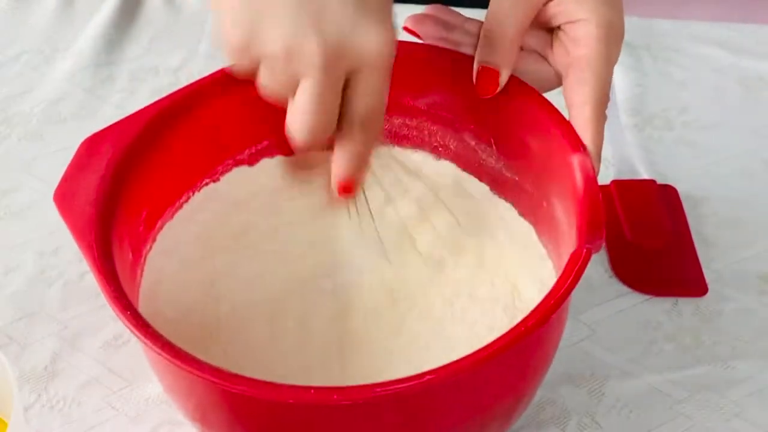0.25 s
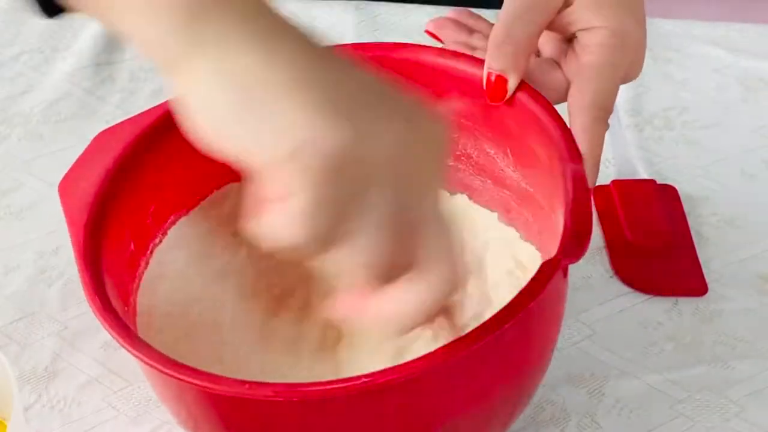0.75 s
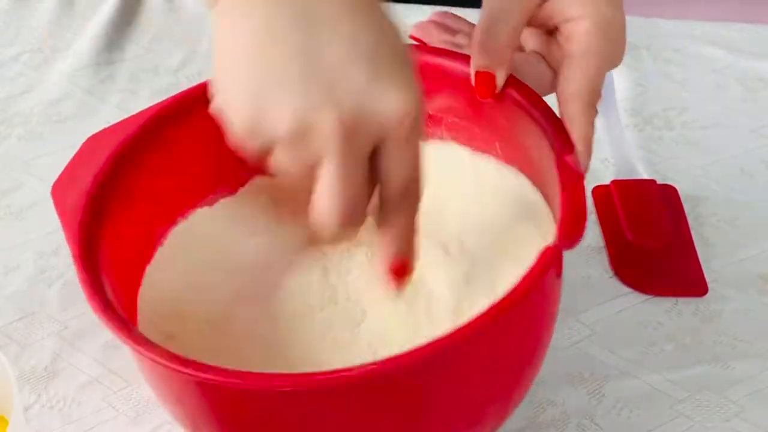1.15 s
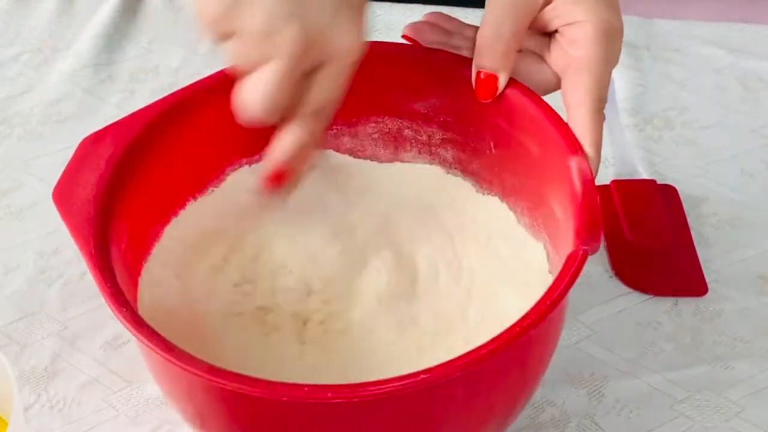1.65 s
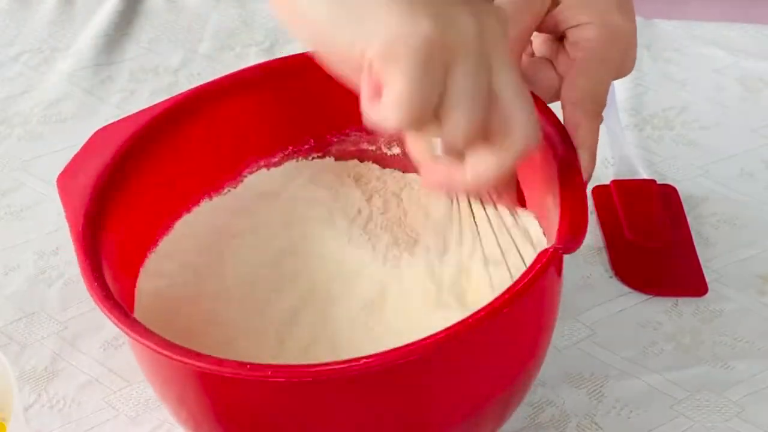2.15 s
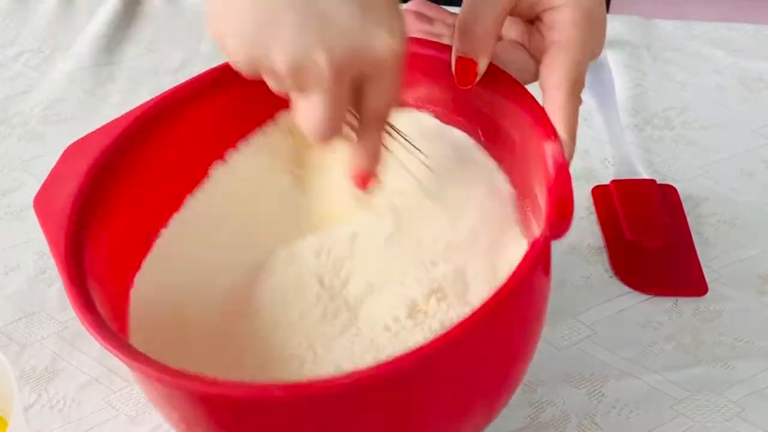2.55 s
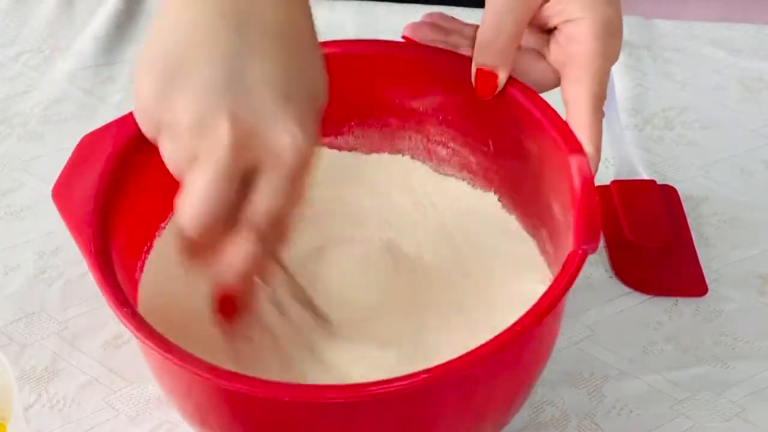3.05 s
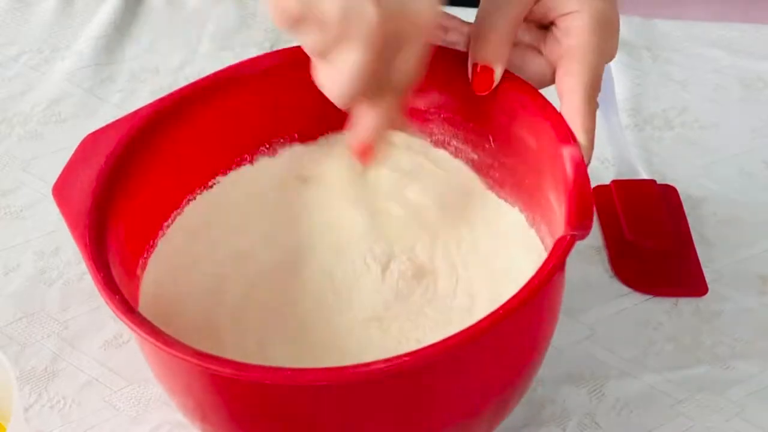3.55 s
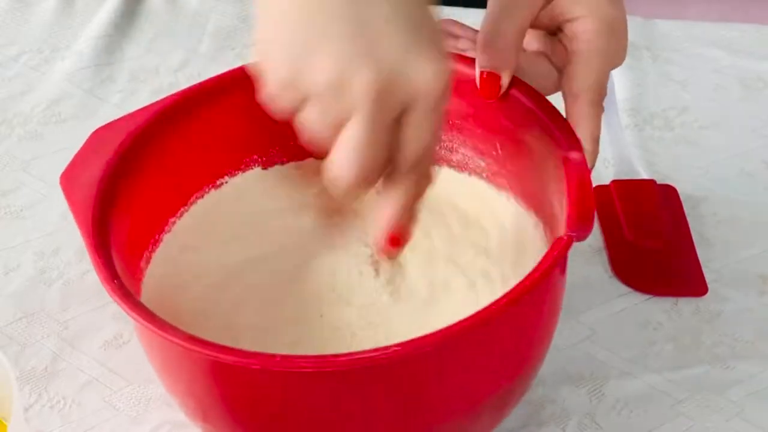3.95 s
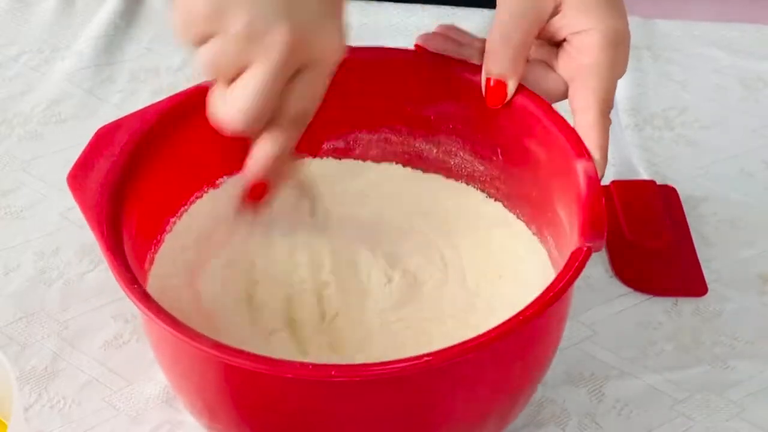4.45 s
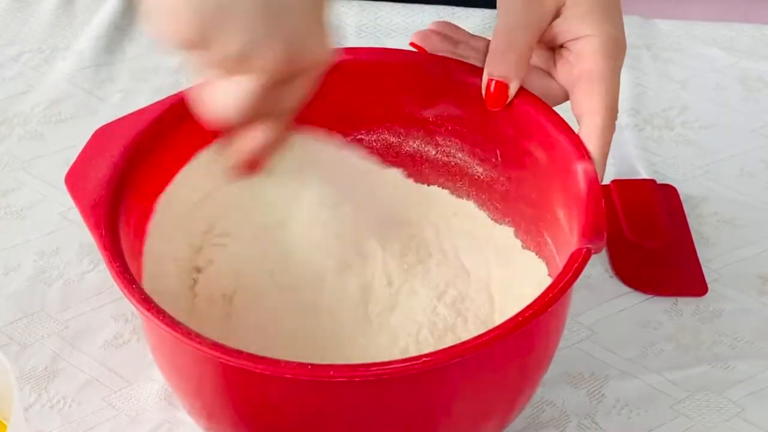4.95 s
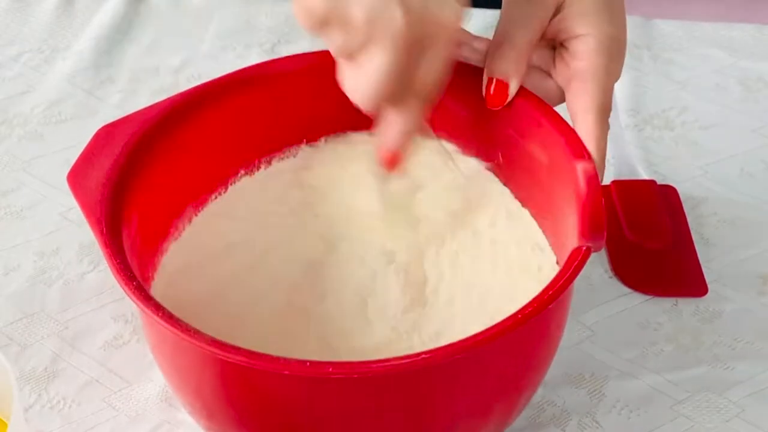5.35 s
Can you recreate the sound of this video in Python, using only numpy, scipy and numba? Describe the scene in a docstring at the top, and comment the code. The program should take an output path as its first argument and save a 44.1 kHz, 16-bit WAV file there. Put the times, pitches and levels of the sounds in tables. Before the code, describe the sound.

A wire whisk stirs dry flour and coarse meal in a plastic bowl for about five and a half seconds, heard from close above. It opens with hollow scrapes and light knocks on the wall. A bright, sandy swish swells at 0.8 seconds, followed by soft thumps around 1 second as the bowl rocks on a cloth-covered table. Scraping returns from 1.3 to 2 seconds, ending in a firmer knock. Hissing, gritty sweeps come in quick succession from 2.2 to 3.1 seconds, with a sharp wire click near 2.9. Lighter swishes, crunching and scrapes continue, with dull bumps around 3.7 and 4 seconds. From 4.7 seconds to the end, the powder swishes strongly again in several surges, with more clicks and low bumps. Small wire ticks are scattered throughout, over a very faint low room rumble.

```python
"""Wire tips scrape and knock on a plastic bowl as a whisk circles through dry flour and cornmeal.
Stick-slip friction and impacts drive the wall's modes; powder hisses through the wires, grit patters
and coarse meal crunches, each a dense train of random collisions. The wires tick, and the bowl
rocks on a cloth-covered table over a faint room rumble. A phone close above hears the powder first
at its left microphone port and the other layers first at its right."""
import sys
import numpy as np
from scipy import signal
from scipy.fft import rfft, irfft, next_fast_len
from scipy.io import wavfile
from numba import njit

SR = 44100
rng = np.random.default_rng(int(sys.argv[2]) if len(sys.argv) > 2 else 0)


def waveform_to_disk(signal):
    """Save audio, clipped to [-1, 1], as 16-bit WAV at the path in sys.argv[1]."""
    frames = np.transpose(np.atleast_2d(signal))
    scaled = np.clip(frames, -1, 1) * 32767
    samples = np.round(scaled).astype(np.int16)
    wavfile.write(sys.argv[1], SR, samples)


N = 246959

# Wire tips dragging on the plastic. Each row: middle in seconds, length in seconds, scrape level in dB,
# centre frequency in Hz, crunch level in dB.
SCRAPES = [(0.081, 0.13, -29, 1030, -32.5), (0.149, 0.054, -28, 960, -44), (0.202, 0.14, -29.5, 1000, -41),
           (0.349, 0.074, -24.5, 1120, -33), (0.423, 0.077, -25, 870, -46),
           (0.467, 0.16, -26.5, 1080, -36.5), (0.712, 0.15, -40, 660, -55), (0.81, 0.07, -34, 1190, -31),
           (1.075, 0.16, -37, 860, -35.5), (1.233, 0.13, -33, 1020, -44), (1.369, 0.11, -25.5, 1075, -31.5),
           (1.6, 0.23, -30.5, 1250, -43), (1.648, 0.15, -26, 1010, -33), (1.782, 0.095, -29.5, 930, -30.5),
           (1.836, 0.074, -29.5, 1150, -31), (1.892, 0.052, -38, 1000, -36),
           (1.94, 0.14, -22.5, 1075, -35.5), (2.193, 0.14, -37, 1140, -42), (2.297, 0.031, -34, 710, -25.5),
           (2.396, 0.033, -35.5, 980, -25.5), (2.505, 0.092, -40, 1330, -32.5),
           (2.579, 0.019, -30.5, 1410, -34), (2.716, 0.096, -29, 1410, -29.5),
           (2.847, 0.18, -30.5, 1070, -33), (3.054, 0.067, -27.5, 1330, -39),
           (3.153, 0.76, -37.5, 1140, -34), (3.162, 0.12, -28, 1110, -47), (3.253, 0.049, -35.5, 1070, -38),
           (3.413, 0.13, -29.5, 990, -35), (3.497, 0.26, -30.5, 1140, -49), (3.746, 0.13, -29.5, 930, -41),
           (3.837, 0.15, -29.5, 1140, -50), (4.012, 0.12, -34, 1060, -48), (4.15, 0.13, -27.5, 1060, -47),
           (4.29, 0.16, -37.5, 1040, -57), (4.378, 0.046, -31.5, 1130, -43), (4.463, 0.11, -26, 760, -38),
           (4.665, 0.17, -38.5, 1250, -36), (4.797, 0.18, -35, 1100, -41), (5.022, 0.17, -38, 1100, -29.5),
           (5.182, 0.1, -31.5, 1250, -49), (5.246, 0.026, -31.5, 1190, -49), (5.34, 0.14, -34, 1010, -28),
           (5.542, 0.1, -30, 1060, -26)]
# Powder streaming through the wires, swelling on each fast sweep. Each row: time in seconds,
# hiss level in dB, crunch level in dB, coarse patter relative to the hiss in dB.
STREAM = [(0.0, -52, -58, -17), (0.3, -50.5, -48, -2), (0.53, -39.5, -38.5, -0.5), (0.65, -38.5, -40, 0.5),
          (0.8, -21, -31.5, -5.5), (0.87, -23, -30.5, -9), (0.93, -30, -36, -4.5),
          (1.15, -32.5, -40.6, 0.5), (1.45, -34, -37, -4), (2.07, -45, -44, 1.5), (2.27, -22, -29, -3),
          (2.43, -28.5, -32, -5), (2.5, -27, -33.5, -1), (2.56, -31, -36, 0), (2.6, -39.5, -40.5, 1),
          (2.7, -32, -46, -1), (3.1, -36.5, -42, -1.5), (3.4, -41, -44, -0.5), (3.7, -49, -52, 3),
          (4.05, -51, -40, -2), (4.35, -45.5, -39, -1.5), (4.55, -43, -37, 1.5), (4.7, -29.5, -45, -2),
          (4.79, -23.5, -29, -3), (4.87, -20, -26.5, -8.5), (4.95, -27, -41.5, -1.5),
          (5.08, -28, -46, -1.5), (5.13, -28, -40, -3), (5.17, -25, -24.5, -6), (5.24, -25, -26, -9.5),
          (5.34, -34.5, -54, 2), (5.46, -25, -37.5, -4.5), (5.6, -24, -25, -8)]
# Flicks that throw powder. Each row: middle in seconds, length in seconds, three levels as in STREAM.
FLICKS = [(0.073, 0.059, -35, -37, -3), (0.145, 0.13, -47.5, -47, 2.5), (0.235, 0.088, -39, -34.5, 0.5),
          (0.328, 0.053, -37, -40, 0), (0.49, 0.096, -41, -31.5, 5), (1.193, 0.041, -19, -44, -4),
          (1.26, 0.088, -23, -25, -13), (1.397, 0.066, -36, -30, 5), (1.526, 0.017, -31, -33.5, -19),
          (1.82, 0.081, -33, -42, -21), (1.958, 0.08, -40.5, -34, 3), (2.646, 0.035, -23.5, -49, -2.5),
          (2.747, 0.16, -26, -32.5, -25), (2.884, 0.028, -28, -24.5, -2), (2.978, 0.097, -22.5, -56, -6),
          (3.046, 0.049, -25, -30.5, -6.5), (3.21, 0.11, -35.5, -31.5, -1), (3.298, 0.064, -27, -37, -3.5),
          (3.348, 0.011, -27, -36, -14), (3.527, 0.19, -34, -32, -0.5), (3.653, 0.038, -26, -40, -6),
          (3.716, 0.017, -34, -39, -4), (3.88, 0.28, -33.5, -31, -0.5), (3.97, 0.052, -24, -50, -6.5),
          (4.031, 0.0088, -27, -29.5, -10), (4.12, 0.055, -41, -48, -16), (4.176, 0.19, -41, -38.5, 2.5),
          (4.24, 0.025, -37, -48, -8), (4.317, 0.068, -30.5, -43, -6), (4.464, 0.054, -40.5, -47, 1),
          (4.53, 0.026, -50, -32, 8), (4.979, 0.044, -27.5, -31.5, 0)]
# The crunch's colour as the wires near and leave the wall. Each row: time in seconds, centre in Hz.
CRUNCH_CENTRE = [(0.0, 1810), (0.06, 2280), (0.14, 1900), (0.78, 2200), (0.87, 2740), (1.06, 2190),
                 (1.26, 2510), (1.4, 1900), (1.46, 2560), (1.53, 2000), (1.7, 2200), (1.78, 1900),
                 (2.2, 2330), (2.24, 2020), (2.31, 2680), (2.63, 2290), (2.7, 2840), (2.78, 2220),
                 (2.95, 2170), (3.06, 2660), (3.12, 2140), (3.91, 2150), (3.98, 2620), (4.21, 1850),
                 (4.62, 2330), (4.77, 2090), (4.94, 2850), (4.99, 2450), (5.43, 2360), (5.47, 1810),
                 (5.54, 2640), (5.6, 2520)]
# The bowl rocking. Each row: time in seconds, level in dB, low sway relative to the rim's drone in dB.
ROCKING = [(0.0, -50, -2.5), (0.33, -39.5, -3), (0.61, -51, 1.5), (0.67, -44, -11), (0.97, -49.5, 1),
           (1.01, -34.5, -8), (1.06, -30.5, -5.5), (1.17, -42.5, 0.5), (1.26, -34, -4.5), (1.34, -48, 3),
           (1.4, -34, -1), (1.46, -51, -2), (1.67, -45.5, 4.5), (1.73, -43.5, -17), (2.0, -41, -7),
           (2.06, -55, 0), (2.2, -42, -6), (2.48, -49, 6.5), (2.51, -41.5, -13), (2.6, -49, 6),
           (2.73, -35.5, -10), (2.85, -46, 5), (2.89, -41.5, -3.5), (3.66, -45.5, 0), (3.73, -43, 3),
           (3.74, -46, 11), (3.88, -43, -6), (4.01, -51, -3), (4.04, -38, -13), (4.07, -50, 12),
           (4.18, -48, -2), (5.15, -41, 0.5), (5.26, -35, -0.5), (5.43, -46, -1), (5.57, -32, -4),
           (5.6, -47, 7)]
# A wire loop striking the wall. Each row: start in seconds, level in dB.
KNOCKS = [(0.059, -17.5), (0.085, -22), (0.156, -16.0), (0.347, -23), (0.4655, -24), (0.4795, -18),
          (0.489, -20), (1.354, -16.5), (1.929, -14.0), (1.954, -8), (2.166, -24), (2.392, -22),
          (3.055, -23.0), (3.375, -21), (3.412, -17.5), (4.037, -23), (4.086, -23), (4.149, -18),
          (5.337, -25)]
# The bowl's foot striking the table. Each row: start in seconds, level in dB, frequency in Hz.
BUMPS = [(0.092, -27, 97), (1.005, -21, 252), (1.035, -18, 307), (1.061, -16, 300), (1.091, -24, 107),
         (1.22, -40, 122), (3.72, -20.5, 107), (4.032, -23, 313), (4.059, -24, 92), (5.089, -25.5, 117),
         (5.167, -22, 162), (5.341, -28, 117), (5.486, -23.5, 126)]
# Wires snapping free or colliding. Each row: start in seconds, levels of snap, ring and body in dB.
TICKS = [(0.2332, -21.0, -27, -24), (0.4654, -21.0, -22, -18.0), (0.4833, -18.0, -29, -22),
         (0.4887, -18, -30, -17.0), (0.5091, -23, -34.0, -33), (0.647, -22.0, -23, -35.0),
         (0.703, -18, -19, -21.5), (0.7407, -6, -17, -25.0), (1.1774, -13.0, -20, -35.0),
         (1.187, -6, -12, -16), (1.1926, -18.0, -23, -33), (1.22, -24, -24, -14.0),
         (1.258, -35.0, -35.0, -21), (1.2707, -19, -21.0, -17), (1.395, -11.5, -16.0, -12),
         (2.028, -11.5, -29, -35.0), (2.1672, -33, -21, -23), (2.2266, -10, -16, -17.0),
         (2.2746, -35.0, -18, -19), (2.298, -16, -23, -16), (2.393, -7, -24, -20),
         (2.6641, -11, -26.0, -28), (2.68, -17, -22.0, -21), (2.7632, -17, -27, -22),
         (2.8754, -2.5, -6, -13.0), (2.889, -15, -19, -13), (3.029, -21, -33, -18.0),
         (3.2231, -11, -20.0, -12), (3.2515, -21, -25, -16.5), (3.3481, -17.0, -28.0, -26),
         (3.7151, -20.0, -22, -28), (3.7666, -31.0, -42, -14), (3.8862, -14.0, -25, -21.0),
         (4.032, -19.0, -25, -14.0), (4.0348, -19, -27.0, -19), (4.2164, -19, -23, -24.0),
         (4.5227, -22, -25, -16), (4.5266, -35.0, -27.0, -23), (4.533, -22, -31.0, -17),
         (4.8067, -39, -16, -17), (4.825, -12.0, -21, -35.0), (4.8475, -7, -15, -12),
         (4.9827, -14.0, -14.0, -16), (5.0732, -15.0, -31, -18.0), (5.1217, -13.0, -23.0, -30.0),
         (5.148, -18, -27, -23), (5.2022, -21.0, -15, -19), (5.3367, -5, -10, -13), (5.4, -16, -25, -35.0),
         (5.4818, -7.0, -18, -19.0), (5.5457, -26.0, -21.0, -19), (5.5673, -35.0, -18, -13)]
# The whisk stalling. Each row: middle in seconds, length in seconds, change of level in dB.
STALLS = [(0.523, 0.052, -7), (1.205, 0.022, -8), (3.016, 0.016, -2.5), (3.327, 0.017, -6),
          (3.367, 0.018, -8.5), (3.753, 0.042, -14.5), (3.999, 0.042, -7.5), (4.067, 0.038, -7.5),
          (4.503, 0.026, -4.5), (5.501, 0.011, -6)]

# Spectral peaks. Each row: frequency in Hz, bandwidth in Hz, gain in dB.
WALL_MODES = [(524, 47, 5), (676, 134, 2), (823, 94, -1.5), (898, 23, 1.5), (1049, 40, -5.5),
              (1121, 16.3, 3.5), (1212, 59, -0.5), (1354, 52, 3), (1487, 58, -1.5), (1642, 7.1, 4),
              (1920, 18, 1), (1998, 47, -2.5), (2290, 73, 0), (2950, 47, -29)]
GRIT_COLOURS = [(3880, 100, 1.5), (4454, 140, 13), (4950, 640, -5), (5690, 300, 8), (6620, 320, -1),
                (7610, 560, -1)]  # narrow peaks in the patter
HOLLOW_MODES = [(1793, 310, -4), (2065, 67, 7), (2280, 540, -6), (2585, 93, 6.5), (2754, 90, 5),
                (3067, 223, 7), (3540, 500, -3)]  # spaces between wires and wall
BOWL_MODES = [(116.7, 6.7, 3), (177.6, 49, -1), (247, 91, -5), (310, 72, -1.5), (368, 59, -1.5),
              (463, 110, -8)]  # two of the sway, then four of the rim

# Spectral envelopes. Each row: frequency in Hz, gain in dB.
POWDER_SPECTRUM = [(8000, -24), (10000, -8), (12000, 0), (14000, 0), (15800, -1)]
THICK_STREAM_SPECTRUM = [(5800, -22), (7000, -5), (8500, -1), (10300, 0), (12000, -6), (14000, -20)]
GRIT_SPECTRUM = [(2800, -47), (3800, 0.5), (5000, 0.5), (5800, 1.5), (6800, -0.5), (8000, 5)]
MEAL_SPECTRUM = [(1000, -2), (1700, 0), (2700, -3.5), (3400, -1), (4500, 0), (6000, -51)]
SNAP_SPECTRUM = [(9000, -32), (10500, 4), (13000, -2), (16500, 1)]
WIRE_SPECTRUM = [(3800, -35), (4800, -8), (7000, 0.5), (8800, 0.5), (10000, -34)]
ROOM_SPECTRUM = [(24, -32), (35, -9), (55, -1), (80, -5.5), (130, -4), (300, -37)]

# Positions. Each triple: left port's lag in ms, left minus right in dB, unshared fraction of the power.
AT_POWDER, AT_MEAL, AT_GRIT = (-.154, 0, .015), (.11, .7, .35), (.19, 2.7, .84)
AT_WALL, AT_TABLE = (.029, -3.5, .27), (.22, -1.6, .037)

CONTACT_DB, CONTACT_HZ = -43.5, 1033  # light contact between scrapes
SCRAPE_SAG_HZ = 138  # the centre sinks as the tips slide down the wall
SETTLING_DB = -49.5  # grains trickle back between strokes
GRIT_PER_CRUNCH = .24  # dB per dB: crushed meal spits grit
WALL_LOSS_DB = 33  # makes up for what a knock loses in the wall's resonances
CUTOFF_HZ = 16600


def undb(db):
    """Amplitude ratio of a level; undb(2 * db) is the power ratio."""
    return 10 ** (np.asarray(db) / 20)


def unit(x):
    """Normalisation to unit RMS."""
    return x / np.sqrt(np.mean(x ** 2))


def drift(rate):
    """Random modulation: Gaussian values 1 / rate seconds apart, joined by straight lines."""
    levels = rng.standard_normal(int(N / SR * rate) + 2)
    return np.interp(np.arange(N) * rate / SR, np.arange(len(levels)), levels)


def curves(table, t):
    """Linear interpolation of a table's columns at times t."""
    times, *columns = np.transpose(table)
    return [np.interp(t, times, column) for column in columns]


def swells(t, middle, length, db):
    """Gaussian power envelopes, one row for each event."""
    return undb(2 * db)[:, None] * np.exp(-8 * ((t - middle[:, None]) / length[:, None]) ** 2)


def summed_db(t, *powers):
    """Incoherent sources add in power: their total at times t becomes a level at every sample."""
    return np.interp(np.arange(N) / SR, t, 10 * np.log10(sum(powers)))


@njit
def bandpass(x, hz, width_hz):
    """A resonator of moving centre and unit peak gain, in state-variable form."""
    y, band, low = np.empty(len(x)), 0., 0.
    for i in range(len(x)):
        g, damping = np.tan(np.pi * hz[i] / SR), width_hz / hz[i]
        v = (band + g * (x[i] - low)) / (1 + g * (g + damping))
        band, low = 2 * v - band, low + 2 * g * v
        y[i] = damping * v
    return y


def ring(x, peaks, wander_db=0., rate=12):
    """Parallel resonators, neighbours in opposite phase; wander_db shifts energy among them at random."""
    gains = np.array([undb(db + wander_db * drift(rate)) * (-1) ** k
                      for k, (_, _, db) in enumerate(peaks)])
    total = np.sqrt(np.sum(gains ** 2, axis=0) / np.sum(undb([db for _, _, db in peaks]) ** 2))
    responses = [signal.lfilter(*signal.iirpeak(hz, hz / width, SR), x) for hz, width, _ in peaks]
    return np.sum(gains * responses, axis=0) / total


def colour(x, spectrum):
    """Zero-phase filtering by a spectral envelope."""
    hz, db = np.transpose(spectrum)
    size = next_fast_len(N)
    log_hz = np.log(np.fft.rfftfreq(size, 1 / SR) + 1)
    gain = undb(np.interp(log_hz, np.log(hz), db, left=-60, right=-60))
    return irfft(rfft(x, size) * gain, size)[:N]


def grains(rate, spread_db):
    """Shot noise: random collisions at a mean rate per second, a few of them large."""
    chance, size, strength = rng.random(N), rng.exponential(size=N), rng.standard_normal(N)
    return (chance < rate / SR) * strength * undb(spread_db * np.minimum(size, 6))


def impacts(times, levels_db, decay_ms, rattle, rebound, rebound_ms):
    """Inelastic collisions: each an impulse, one weaker rebound and a decaying rattle."""
    n = np.arange(int(.03 * SR))
    pulses = rattle * rng.standard_normal((len(times), len(n))) * np.exp(-n / (decay_ms * SR / 1000))
    pulses[:, 0] = 1
    pulses[:, int(rebound_ms * SR / 1000)] = -rebound
    force = np.zeros(N + len(n))
    for start, db, pulse in zip(times, levels_db, pulses):
        force[int(start * SR):][:len(n)] += undb(db) * pulse
    return force[:N]


def ports(source, level_db, hits, lag_ms, pan_db, unshared):
    """Partial coherence: two ports share one sound with a time lag, and each hears its own grains too."""
    size = next_fast_len(N)
    common = np.sqrt(1 - unshared) * unit(source()) * undb(level_db) + hits
    delay = np.exp(-2j * np.pi * np.fft.rfftfreq(size, 1 / SR) * lag_ms / 1000)
    left = irfft(rfft(common, size) * delay, size)[:N]
    own = np.sqrt(unshared) * np.array([unit(source()), unit(source())]) * undb(level_db)
    return (np.array([left, common]) + own) * undb([[pan_db / 2], [-pan_db / 2]])


def scrape(centre_hz):
    """Stick-slip friction drives the wall; the contact spot favours the modes near centre_hz."""
    friction = grains(6000, 2.16)
    wall = ring(friction, WALL_MODES, wander_db=4.6, rate=14)
    hollow_hum = bandpass(friction, centre_hz, width_hz=117.)
    return undb(-7) * wall + bandpass(wall, centre_hz, width_hz=460.) + undb(-2) * hollow_hum


def hiss(thick_db):
    """Tiny collisions of flour with the wires merge into noise; a thicker stream sounds deeper."""
    fine = unit(colour(grains(15000, .34), POWDER_SPECTRUM))
    thick = unit(colour(grains(12000, .98), THICK_STREAM_SPECTRUM))
    return fine + undb(thick_db) * thick


def patter():
    """Shot noise: a gritty patter with brief, randomly shifting narrow peaks from about 4 to 8 kHz."""
    grit = colour(grains(8000, .65), GRIT_SPECTRUM)
    return undb(1.5) * grit + ring(grit, GRIT_COLOURS, wander_db=10.2, rate=25)


def crunch(centre_hz):
    """Cavity resonance colours the noise of coarse meal crushed between wires and wall."""
    meal = colour(grains(5000, 1.7), MEAL_SPECTRUM)
    hollow = undb(-7.5) * meal + ring(meal, HOLLOW_MODES, wander_db=5.3, rate=25)
    return undb(-8) * hollow + bandpass(hollow, centre_hz, width_hz=770.)


def rocking(sway_db):
    """Forced vibration: jolts set the rim droning while the whole bowl sways at lower frequencies."""
    jolts = grains(1500, 2.7)
    drone = unit(ring(jolts, BOWL_MODES[2:], wander_db=1.93, rate=5.1))
    sway = unit(ring(jolts, BOWL_MODES[:2], wander_db=1.6, rate=5.6))
    return drone + undb(sway_db) * sway


def rumble():
    """Band-limited noise forms the room's low background."""
    return colour(rng.standard_normal(N), ROOM_SPECTRUM)


def knocks(centre_hz):
    """Impulse response of the wall: a thud, and the modes that the struck spot favours."""
    times, db = np.transpose(KNOCKS)
    blows = impacts(times, db + WALL_LOSS_DB, decay_ms=.14, rattle=.057, rebound=.17, rebound_ms=5.3)
    wall = bandpass(ring(blows, WALL_MODES) + undb(1) * blows, centre_hz, width_hz=230.)
    return bandpass(wall, centre_hz, width_hz=900.)  # the plastic gives, so little treble passes


def bumps(t, decay_cycles=2.43, rise_s=.0021):
    """Damped oscillation of the whole bowl after its foot meets the table."""
    wobble = np.zeros(N)
    for start, db, hz in BUMPS:
        age = np.maximum(t - start, 0)
        envelope = np.exp(-age * hz / decay_cycles) * (1 - np.exp(-age / rise_s))
        wobble += undb(db) * envelope * np.sin(2 * np.pi * hz * age)
    return wobble


def ticks(times, levels_db, spectrum):
    """Broadband transients of wires snapping free or colliding, filtered by a unit-peak response."""
    clicks = impacts(times, levels_db, decay_ms=.8, rattle=.25, rebound=.85, rebound_ms=1.4)
    return colour(clicks, spectrum) / colour(np.arange(N) == 0, spectrum)[0]


def scene():
    """Superposition: the whisk's motion sets the levels of the bowl's layers, which add to the room's."""
    t = np.arange(N) / SR
    slow_t = t[::64]  # envelopes need only a coarse time grid
    stream_db, stream_meal_db, stream_coarse_db = curves(STREAM, slow_t)
    flick_s, flick_len, flick_db, flick_meal_db, flick_coarse_db = np.transpose(FLICKS)
    drag_s, drag_len, drag_db, drag_hz, drag_meal_db = np.transpose(SCRAPES)

    drags, contact = swells(slow_t, drag_s, drag_len, drag_db), undb(2 * CONTACT_DB)
    scrape_db = summed_db(slow_t, contact, *drags)
    progress = np.clip((slow_t - drag_s[:, None]) / drag_len[:, None], -1, 1)
    sliding_hz = drag_hz[:, None] - SCRAPE_SAG_HZ * progress
    mean_hz = ((sliding_hz * drags).sum(axis=0) + contact * CONTACT_HZ) / (drags.sum(axis=0) + contact)
    scrape_hz = np.interp(t, slow_t, mean_hz)

    hiss_db = summed_db(slow_t, undb(2 * stream_db), *swells(slow_t, flick_s, flick_len, flick_db))
    coarse_db = summed_db(slow_t, undb(2 * SETTLING_DB), undb(2 * (stream_db + stream_coarse_db)),
                          *swells(slow_t, flick_s, flick_len, flick_db + flick_coarse_db))
    crunch_db = summed_db(slow_t, undb(2 * stream_meal_db),
                          *swells(slow_t, flick_s, flick_len, flick_meal_db),
                          *swells(slow_t, drag_s, drag_len, drag_meal_db))
    crunch_hz = curves(CRUNCH_CENTRE, t)[0] + 80 * drift(12)
    thick_db = coarse_db - hiss_db - 2.5 + 1.3 * drift(9.9)
    grit_db = coarse_db - 1 + GRIT_PER_CRUNCH * (crunch_db - crunch_db.mean()) + 1.1 * drift(13)
    rock_db, sway_db = curves(ROCKING, t)
    stall_db = sum(db * np.exp(-(2 * (t - middle) / length) ** 4) for middle, length, db in STALLS)
    pace_db = stall_db + .8 * drift(30)  # the hand's pace moves powder and meal together

    tick_s, snap_db, wire_db, body_db = np.transpose(TICKS)
    tick_top = ticks(tick_s, snap_db, SNAP_SPECTRUM) + ticks(tick_s, wire_db, WIRE_SPECTRUM)
    tick_body = ticks(tick_s, body_db, MEAL_SPECTRUM)
    wall_knocks = knocks(scrape_hz)

    # Each layer takes a fixed trim in dB and a random flutter of level.
    powder = ports(lambda: hiss(thick_db), hiss_db + pace_db + 3.5 + 2 * drift(150),
                   tick_top, *AT_POWDER)
    grit = ports(patter, grit_db + pace_db + 1.46 * drift(80), 0, *AT_GRIT)
    meal = ports(lambda: crunch(crunch_hz), crunch_db + pace_db + 3.5 + 1.24 * drift(60),
                 tick_body, *AT_MEAL)
    wall = ports(lambda: scrape(scrape_hz), scrape_db + stall_db - .23 + 1.9 * drift(40),
                 wall_knocks, *AT_WALL)
    bowl = ports(lambda: rocking(sway_db), rock_db + 4.5 + 1.3 * drift(22), bumps(t), *AT_TABLE)
    room = ports(rumble, -46 + 4.2 * drift(11), 0, *AT_TABLE)
    return powder + grit + meal + wall + bowl + room


def record(dry):
    """Saturation and band limiting: the phone clips at full scale and cuts the highest treble."""
    lowpass = signal.ellip(12, .2, 70, CUTOFF_HZ, fs=SR, output="sos")
    return signal.sosfilt(lowpass, np.clip(dry, -1, 1))


dry = scene()
out = record(dry)
waveform_to_disk(out)
```